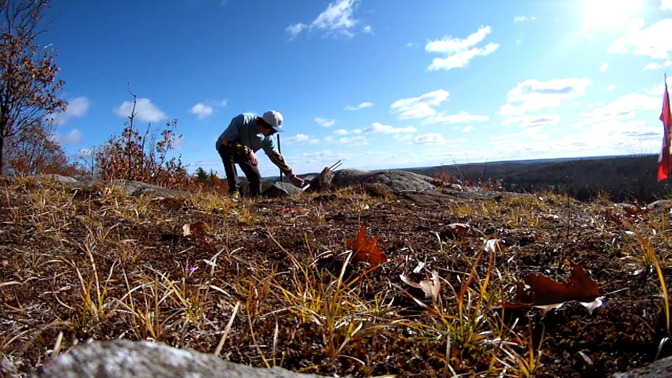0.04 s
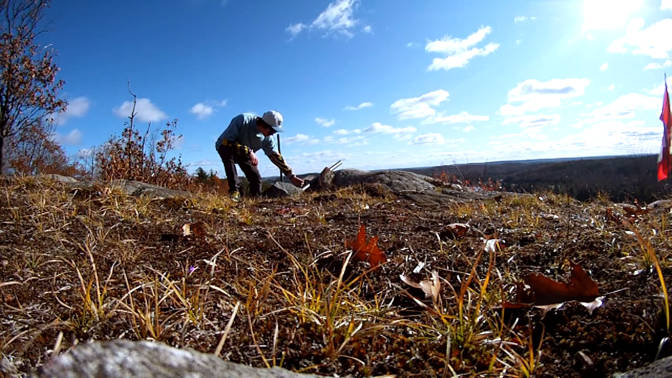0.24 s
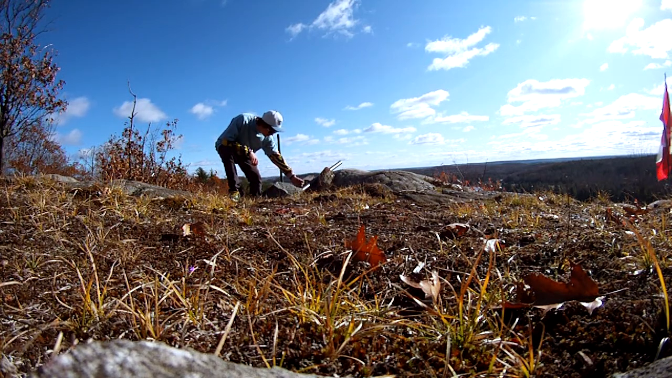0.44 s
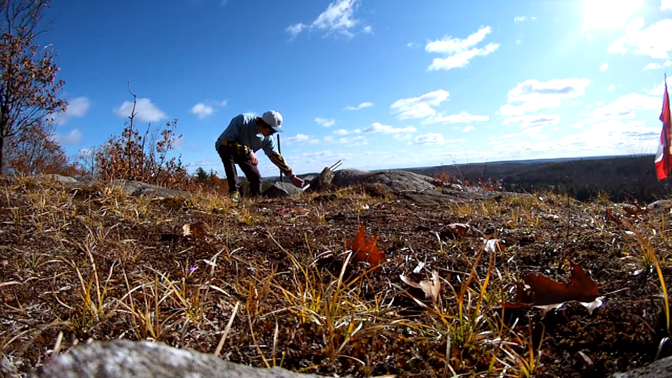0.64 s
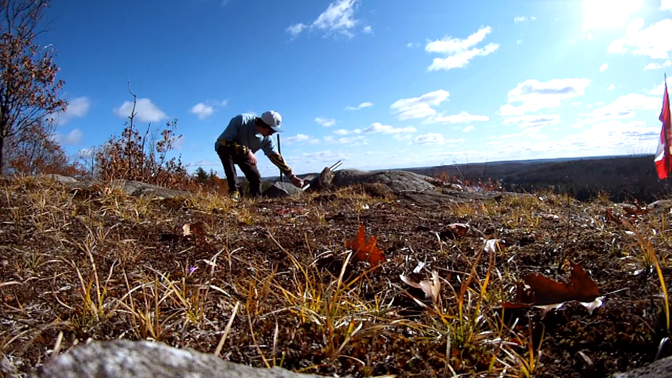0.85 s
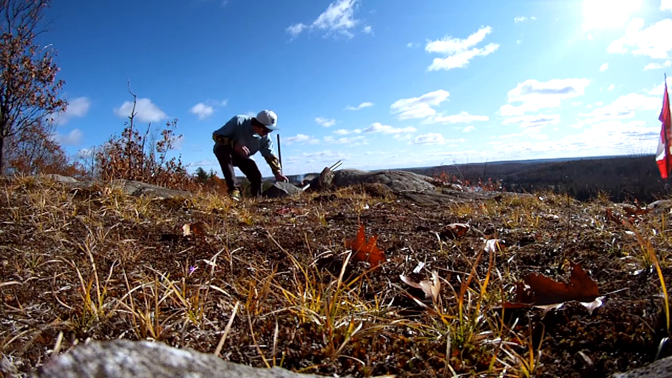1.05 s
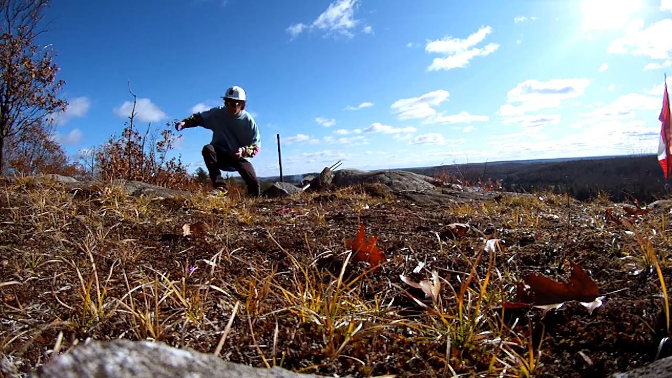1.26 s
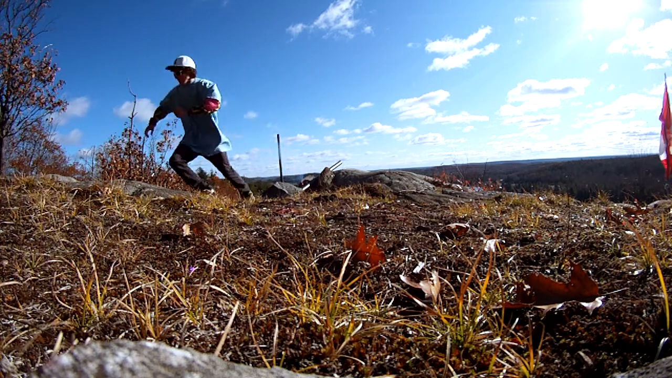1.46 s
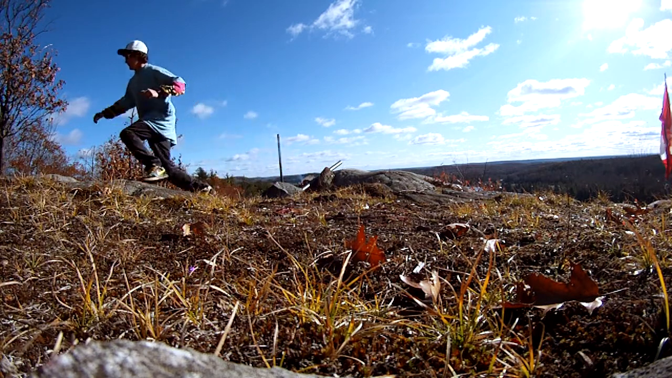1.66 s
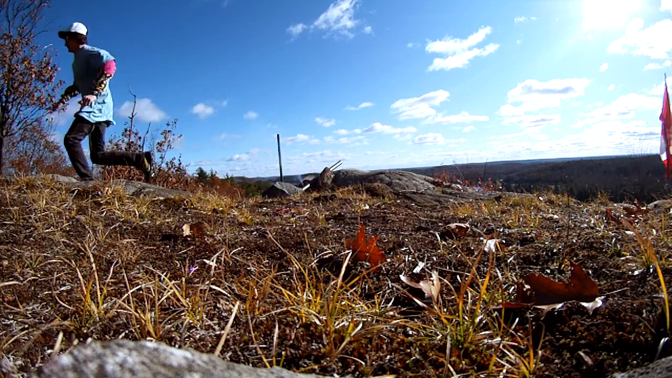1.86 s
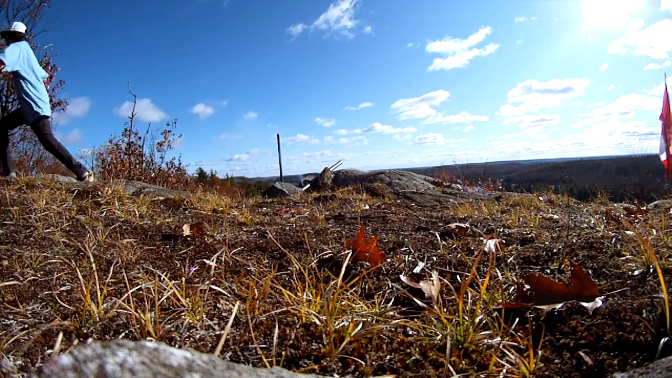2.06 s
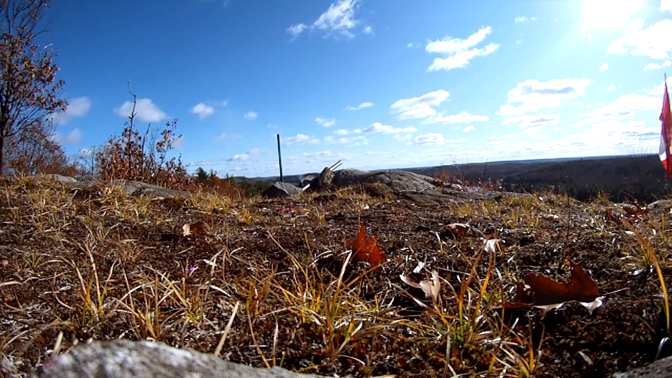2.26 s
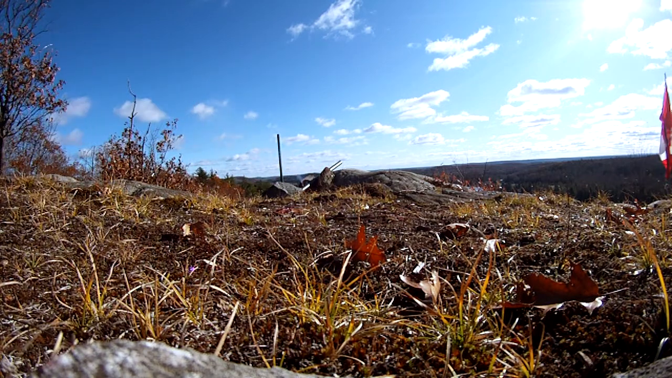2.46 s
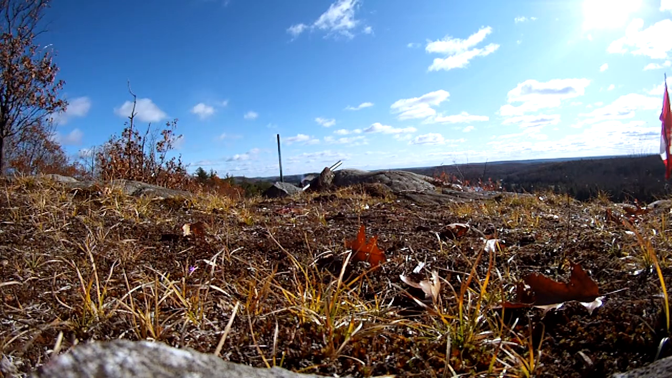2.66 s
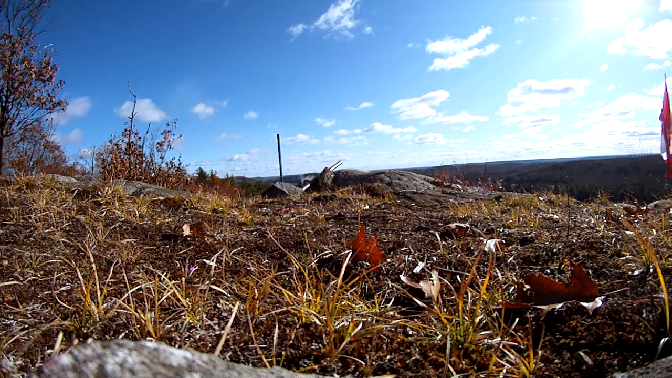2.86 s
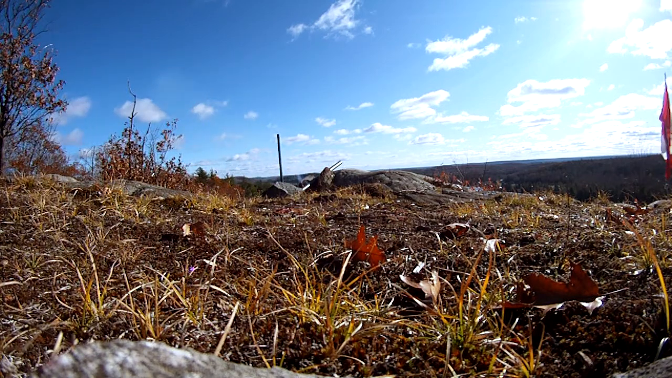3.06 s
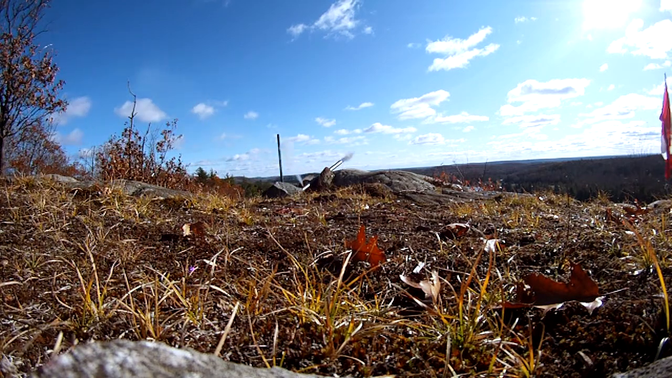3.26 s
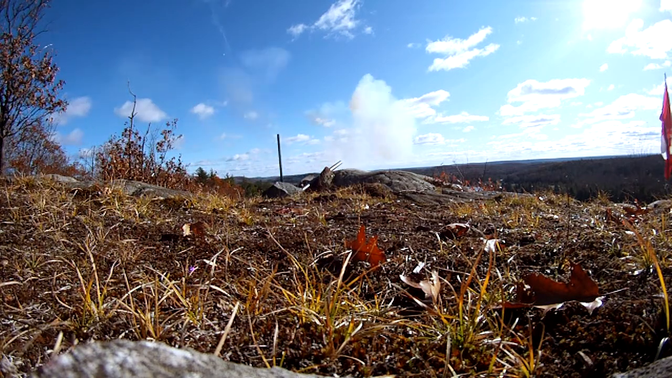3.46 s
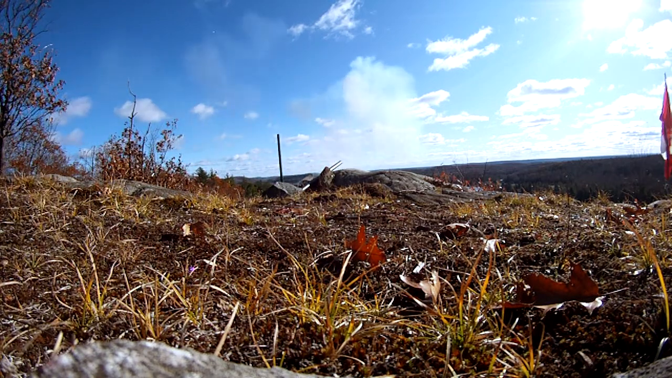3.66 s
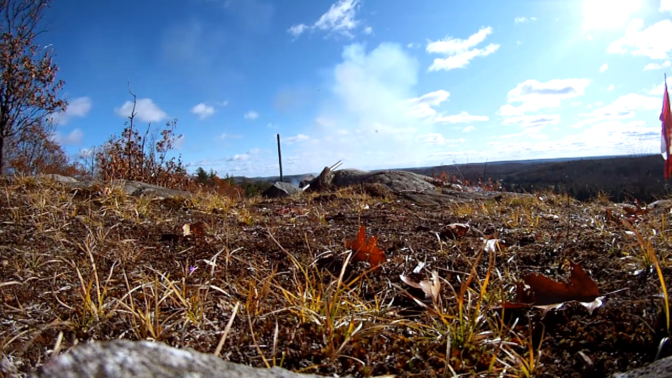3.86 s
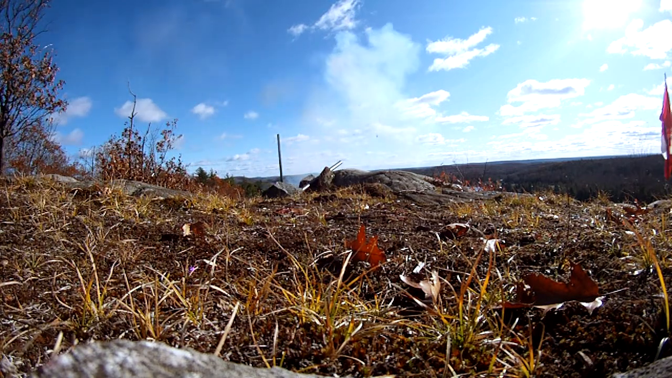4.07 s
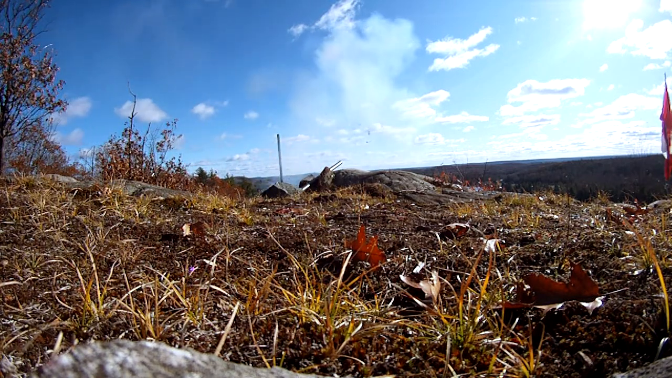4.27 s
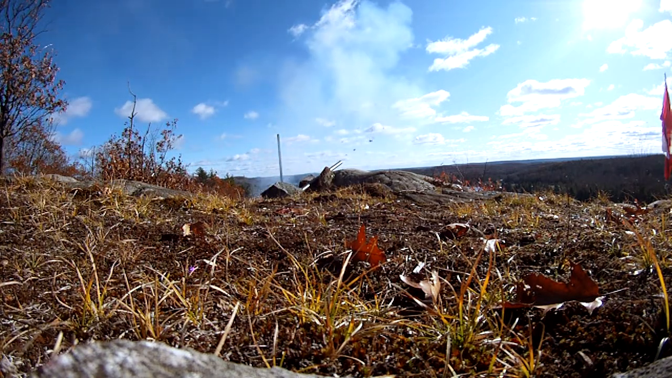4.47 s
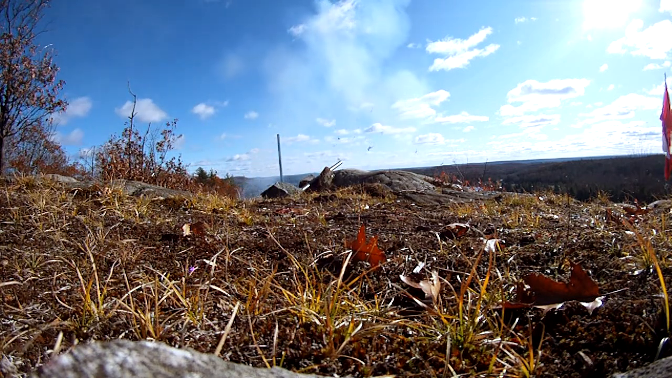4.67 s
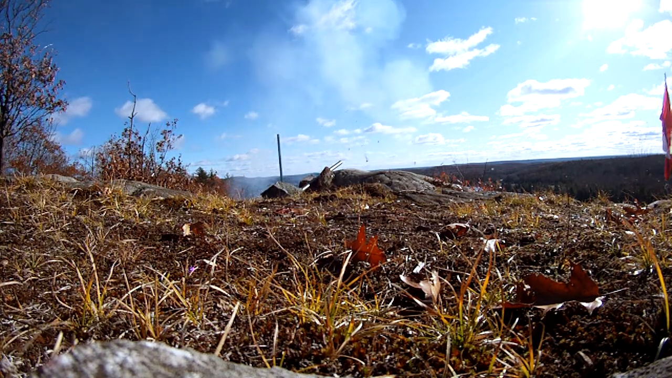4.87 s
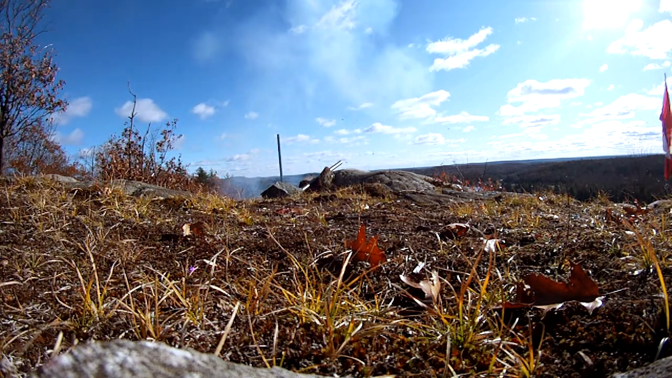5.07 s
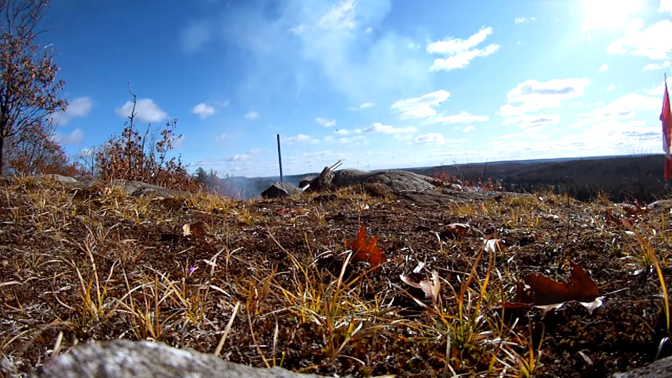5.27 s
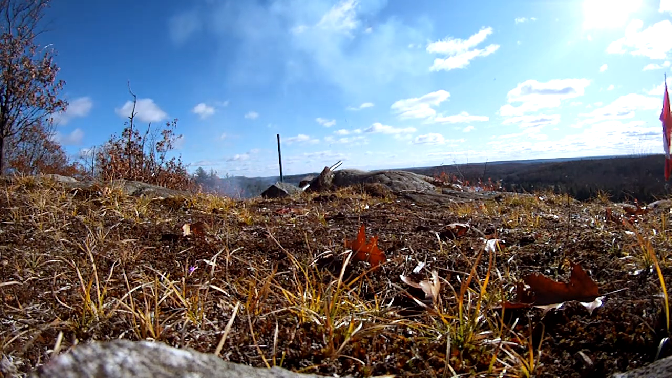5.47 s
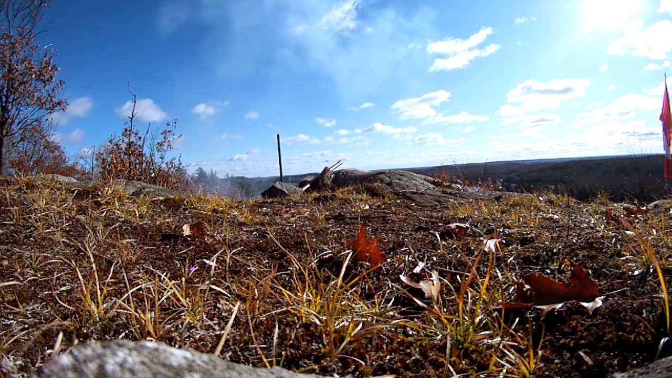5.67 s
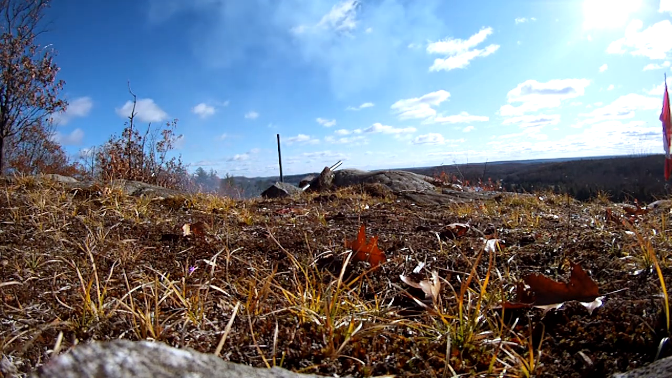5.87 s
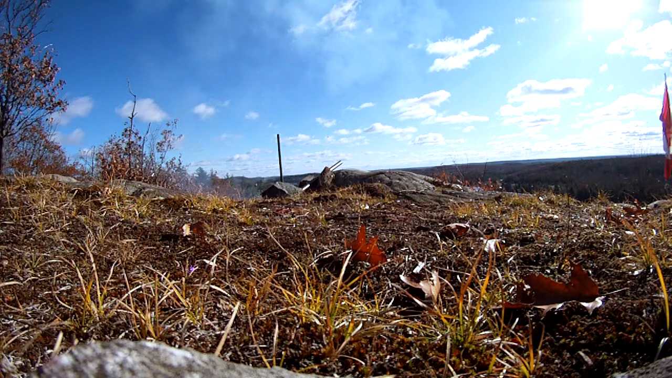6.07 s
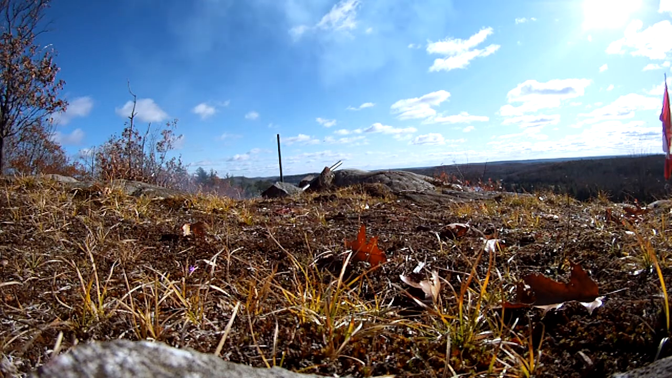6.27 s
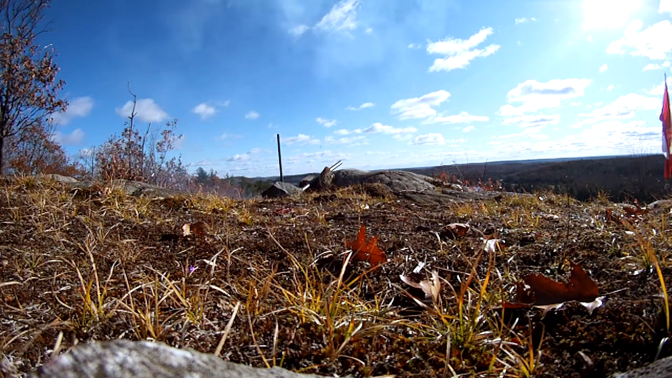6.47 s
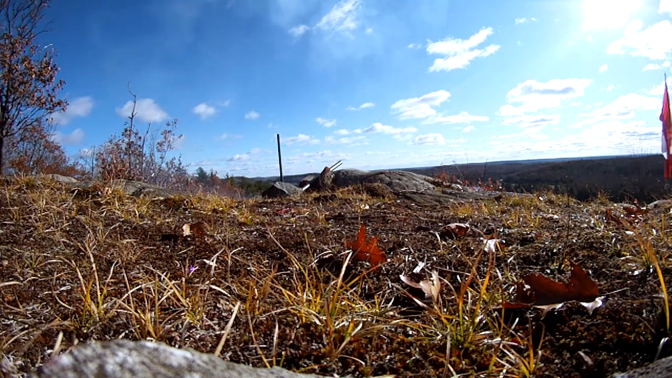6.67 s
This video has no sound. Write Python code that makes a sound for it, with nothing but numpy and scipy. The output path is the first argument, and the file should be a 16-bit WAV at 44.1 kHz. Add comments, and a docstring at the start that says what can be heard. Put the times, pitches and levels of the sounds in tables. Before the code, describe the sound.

A faint breeze on an open hilltop, heard close to the ground in dry grass. Around 0.6 s a fuse catches with soft, short flares, and from 0.85 s it hisses steadily, a grainy, sputtering gas jet. From 1.6 to 3.1 s someone runs clear: irregular dull thuds with scuffs on thin soil, the strongest at about 2.7 s. The hiss dips slightly, then at 3.27 s a small cannon fires once: sharp crack, tearing gas and a heavy low boom, flattened by overload and choked for an instant near 3.32 s. The blast decays within about half a second. Rumble rolls back from wooded ridges, swelling near 3.6, 3.9 and 4.5 s with knocking echoes, increasingly dull. A brighter residual hiss weakens and stops at 4.7 s. Fainter echoes return around 5.3 to 6.4 s, with tiny dry-leaf crunches and one soft step near 6.2 s.

```python
"""A fuse catches and hisses in a faint hilltop breeze, a few metres from a microphone in dry grass.
Someone runs clear on thin soil; then a small pipe cannon fires once and overloads the microphone.
The boom rolls back from wooded hills while the hiss burns on briefly; late on, dry leaves crunch.
Jet, blast, echoes and breeze are coloured noise; boom, steps and clear echoes are decaying sines."""
import sys
import numpy as np
from scipy import signal
from scipy.fft import rfft, irfft, next_fast_len
from scipy.io import wavfile
from scipy.ndimage import uniform_filter1d, map_coordinates

SR = 44100
rng = np.random.default_rng(int(sys.argv[2]) if len(sys.argv) > 2 else 0)


def log_audio(samples):
    """Write samples as a 16-bit WAV file to the path given in sys.argv[1]."""
    # one column per channel
    frames = np.atleast_2d(samples).T
    # limit to full scale, then quantise
    limited = np.clip(frames, -1, 1)
    pcm = np.round(limited * 32767).astype(np.int16)
    wavfile.write(sys.argv[1], SR, pcm)


N = 296433  # length in samples

# All source levels are in dB re full scale, ahead of the microphone, unless called relative.
SHOT_S = 3.272

# Powder blast close by. Each row: frequency in Hz, relative level in dB per Hz.
BLAST_SPECTRUM = [(29, -55.5), (50, -18), (165, -5.5), (195, -5), (259, -4.5), (362, -10.5), (494, -9.5),
                  (797, -16.5), (1010, -20), (1970, -24.5), (4890, -26.5), (9310, -33.5), (15000, -43)]
# Die-away of the blast among near rock and trees. Each row: frequency in Hz, time to fall 60 dB in s.
BLAST_DECAY = [(80, 0.76), (200, .62), (600, 0.81), (2000, 0.73), (5000, 0.49), (12000, 0.35)]
# Low resonances of the boom. Each row: frequency in Hz, level in dB before build-up and decay,
# time to fall 60 dB in s.
BOOM_RESONANCES = [(147, 9.5, 0.32), (178.2, 7, 0.38), (286, 4.5, 0.35), (431, 0.5, 0.45)]
# Slow suction behind the shock front: deepest moment and release, build-up and relaxation times.
SUCTION_S, SUCTION_END_S = 3.3165, 3.3294
SUCTION_BUILD_S, SUCTION_RELAX_S = .0018, .0065
SUCTION_DEPTH = 55  # full scales, ahead of the microphone

# Rumble from the hills. Each row: frequency in Hz, relative level in dB per Hz.
RUMBLE_SPECTRUM = [(26, -70), (45, -28), (108, -8.5), (165, 2.5), (293, -3), (511, -14.5), (562, -12.5),
                   (713, -23.5), (995, -23), (1580, -42), (2000, -39), (2600, -60), (4400, -120)]
# Wooded ridges, near to far. Each row: arrival in s, length in s, level in dB at arrival.
RIDGES = [(3.615, 0.2, -41), (3.861, 0.57, -35), (4.467, 0.63, -39.5), (5.29, 0.15, -47.5),
          (5.583, 0.17, -50.5), (6.119, 0.17, -47), (6.41, .33, -46.5)]
RIDGE_RISE_S, RIDGE_T60_S, RIDGE_SAG_DB_PER_S = 0.041, 0.79, 3.5
# Even scatter from the trees between the ridges; its level is reckoned at the moment of the shot.
FOREST_DB, FOREST_FADE_DB_PER_S = -40.5, 5.5
# Middle of the rumble relative to its bass: bright from near slopes, dull from far ones.
MIDDLE_NEAR_DB, MIDDLE_FAR_DB = 3, -8
DULL_HALFWAY_S, DULLING_S = 4.05, 0.22
# Single slopes that answer clearly. Each row: arrival in s, envelope peak in dB before muffling,
# pitch in Hz.
CLEAR_SLOPES = [(3.59, -15, 286), (3.791, -23.5, 394), (3.998, -18, 280), (4.152, -25, 258),
                (4.224, -24, 195), (4.394, -24, 230), (4.786, -29.5, 260), (4.924, -28.5, 220),
                (5.65, -33, 240.3), (6.246, -30.5, 230)]

# Gas jet of the fuse before the shot. Each row: frequency in Hz, relative level in dB per Hz.
JET_BEFORE = [(65, -25.5), (110, -6.5), (212, 0.5), (386, -6.5), (455, -4.5), (514, -4.5), (792, -10.5),
              (878, -10.5), (1270, -10.5), (1500, -8), (1770, -8), (3020, -16), (7150, -12.5), (13800, -21),
              (15000, -37.5)]
# Gas jet left after the shot. Each row: frequency in Hz, relative level in dB per Hz.
JET_AFTER = [(300, -5.5), (1000, -4), (1700, 2.5), (2300, -1), (3100, -8.5), (3800, -5.5), (4600, -3.5),
             (5900, -4.5), (7500, -0.5), (10200, -5.5), (13900, -13.5), (15000, -23.5)]
# Spells of burning, before and after the shot. Each row: start in s, end in s, rise in s,
# level in dB at the start, growth in dB per s.
BURNS = [(.84, 3.27, .14, -48.5, 0.64), (3.4, 3.895, .1, -40.5, -8.5), (3.895, 4.712, .05, -45, -0.4)]
BURN_OUT_S = .016  # time constant of the dying jet
TOUCH_HOLE_S, TOUCH_HOLE_DB = .3, -4  # the flame sinks into the barrel just before the shot
# Flares as the fuse catches and as the flame reaches the charge. Each row: centre time in s,
# Gaussian length in s, centre frequency in Hz, width in Hz, level in dB at the peak.
FLARES = [(.63, 0.08, 6500, 2000, -65), (.695, .035, 5230, 1200, -61), (.94, 0.055, 1280, 1670, -49.5),
          (.91, 0.042, 258, 420, -53.5), (3.26, 0.024, 900, 1600, -46), (3.268, 0.01, 220, 220, -27.5),
          (3.273, 0.00098, 998, 900, -15)]

# Footfalls on thin soil over rock, heel and sole apart where both land. Each row: start in s,
# envelope peak in dB before muffling, pitch in Hz, swell time in s.
STEPS = [(1.57, -43.5, 300, .002), (1.8521, -22.5, 245, 0.002), (2.055, -36, 866, 0.00096),
         (2.061, -32.5, 332, 0.0028), (2.095, -31, 227, 0.00078), (2.413, -35, 173, 0.0012),
         (2.6858, -23, 746, 0.00066), (2.6862, -14.5, 316, 0.0014), (2.993, -27, 560, 0.001),
         (2.997, -28, 193, 0.0032), (3.081, -38.5, 214, 0.0031), (6.198, -30, 640, .001)]
# Dry leaves crunching. Each row: centre time in s, Gaussian length in s, centre frequency in Hz,
# width in Hz, level in dB at the peak.
LEAVES = [(5.38, 0.011, 6000, 6060, -63), (5.73, 0.0074, 2250, 1800, -56), (5.775, .007, 2500, 2400, -60),
          (6.2, 0.00093, 8460, 4000, -56), (6.211, 0.0091, 2190, 2100, -59), (6.34, 0.008, 3100, 3400, -57)]

# Open air over the hilltop. Each row: frequency in Hz, relative level in dB per Hz.
AIR_SPECTRUM = [(24, -61), (40, -32.5), (169, 5), (910, -4), (1000, -2.5), (1080, -7.5), (1170, -3.5),
                (1460, -8), (2990, -8.5), (13600, -14), (15000, -31.5)]
AIR_DB = -58.5


def blast():
    """The shot: a bark of gas and a low ring, then scatter from rock and trees that loses its treble first."""
    age = np.maximum(clock() - SHOT_S, 0)
    # the bass needs a few cycles to build up
    build_up = np.minimum(age / 0.028, 1) ** 2
    ring = sum(undb(db - 60 * age / t60) * np.sin(2 * np.pi * hz * age)
               for hz, db, t60 in BOOM_RESONANCES)
    bass_noise = resonate(noise(), 190, 170) * undb(7.5 - 60 * age / 0.33)
    punch = (ring + bass_noise) * build_up
    bark = resonate(noise(), 600, 1100) * undb(10.5 - 60 * age / 0.24)
    # the gas tears out of the muzzle for a tenth of a second, then stops
    tearing = resonate(noise(), 3000, 7500) * undb(-6.5) / (1 + (age / 0.1) ** 8)
    # the shock front itself is a bright crack
    crack = noise() * undb(-4.0) * np.exp(-.5 * ((age - .007) / .0022) ** 2)
    scatter = undb(-11.5) * near_scatter(age)
    onset = np.minimum(age / .012, 1) ** 2
    return onset * (scatter + punch + bark + tearing + crack) + suction()


def near_scatter(age):
    """Rock and trees close by return grainy noise, with its own die-away in each octave band."""
    roar = colour(noise() * undb(1.6 * walk(260)), BLAST_SPECTRUM)
    scatter = np.zeros(N)
    for hz in 1000 * 2. ** np.arange(-5, 5):
        band = shape(roar, lambda f: np.maximum(1 - np.abs(np.log2(f / hz)), 0))
        # the spectrum is that of the sound 0.15 s after the shot
        scatter += band * undb(-60 * (age - .15) / at_pitch(BLAST_DECAY, hz))
    return scatter


def suction():
    """Low pressure behind the shock front: it builds fast, relaxes and lets go within a millisecond."""
    since = clock() - SUCTION_S
    pull = np.exp(np.minimum(since / SUCTION_BUILD_S, -since / SUCTION_RELAX_S))
    release = np.clip((SUCTION_END_S - clock()) / .001, 0, 1)
    return -SUCTION_DEPTH * pull * release


def hills():
    """Countless small echoes merge into a rumble that swells with each ridge and dulls with distance."""
    t = clock()
    echoes = noise() * undb(1.57 * walk(70))
    rumble = colour(echoes, RUMBLE_SPECTRUM)
    bass = shape(rumble, lambda f: 1 / (1 + (f / 380) ** 8))
    middle = rumble - bass
    nearness = 1 / (1 + np.exp((t - DULL_HALFWAY_S) / DULLING_S))
    middle_db = MIDDLE_FAR_DB + (MIDDLE_NEAR_DB - MIDDLE_FAR_DB) * nearness
    roll = np.sqrt(hill_power()) * (unit(bass) + unit(middle) * undb(middle_db))
    arrival = np.clip((t - 3.45) / 0.22, 0, 1)
    answers = sum(thud(s, db, hz, 0.0016) for s, db, hz in CLEAR_SLOPES)
    return arrival * roll + muffle(answers, 120, 1060)


def hill_power():
    """Powers of the forest scatter and of every ridge add, since their echoes are unrelated."""
    t = clock()
    power = undb(FOREST_DB - FOREST_FADE_DB_PER_S * (t - SHOT_S)) ** 2
    for s, length, db in RIDGES:
        # ln 1000 turns a 60 dB fall into a time constant
        ridge = swell(s, s + length, RIDGE_RISE_S, RIDGE_T60_S / np.log(1000))
        power = power + (ridge * undb(db - RIDGE_SAG_DB_PER_S * (t - s))) ** 2
    return power


def fuse():
    """A sputtering jet of powder gas, which blows harder and brighter after the shot."""
    jet = noise() * undb(.55 * walk(13) + 1.0 * walk(170))
    jet = bounce(jet, .0007, db=-17)
    jet = bounce(jet, .0029, db=-15)
    hiss = np.where(clock() < SHOT_S, colour(jet, JET_BEFORE), colour(jet, JET_AFTER))
    return hiss * burning() + puffs(FLARES, grain_db=0.0)


def burning():
    """Strength of the gas jet: each spell catches, burns and dies; the touch hole dims it before the shot."""
    t = clock()
    spells = sum(swell(start, end, rise, BURN_OUT_S) * undb(db + growth * (t - start))
                 for start, end, rise, db, growth in BURNS)
    sunk = np.clip(1 - (SHOT_S - t) / TOUCH_HOLE_S, 0, 1) * (t < SHOT_S)
    return spells * undb(TOUCH_HOLE_DB * sunk)


def bounce(x, lag_s, db):
    """Add a copy off nearby ground; the lag sways with the breeze and combs the treble."""
    lag = lag_s * SR * (1 + 0.056 * walk(3))
    return x + undb(db) * map_coordinates(x, [np.arange(N) - lag], order=3)


def footsteps():
    """Dull thuds, each with a scuff of the sole and a shudder of the turf; later, dry leaves crunch."""
    thuds = sum(thud(s, db, hz, build_s) for s, db, hz, build_s in STEPS)
    load = np.sqrt(np.abs(uniform_filter1d(thuds ** 2, size=200)))
    scuff = load * resonate(noise(), 480, 410) * undb(-12.0)
    age = clock()[:SR // 4]
    turf = noise()[:len(age)] * undb(-60 * age / 0.107)
    turf = turf / np.linalg.norm(turf)
    shudder = undb(-10) * signal.fftconvolve(thuds, turf)[:N]
    crunch = puffs(LEAVES, grain_db=2.5)
    return muffle(thuds + scuff + shudder, 100, 1170) + crunch


def air():
    """Faint breeze over the hilltop: coloured noise whose level wanders slowly."""
    return colour(noise(), AIR_SPECTRUM) * undb(AIR_DB + 0.26 * walk(2.7))


def thud(s, db, hz, build_s):
    """A short pressure pulse: a sine that swells fast and dies."""
    age = np.clip(clock() - s, 0, 1)
    rise = age / build_s
    return undb(db) * rise * np.exp(1 - rise) * np.sin(2 * np.pi * hz * age)


def puffs(rows, grain_db):
    """Short swells of grainy noise, each in its own band."""
    out = np.zeros(N)
    for s, length, hz, width, db in rows:
        grains = noise() * undb(grain_db * walk(300))
        envelope = np.exp(-.5 * ((clock() - s) / length) ** 2)
        out += undb(db) * envelope * resonate(grains, hz, width)
    return out


def swell(start, end, rise_s, fall_s):
    """Envelope that rises, holds until its end, then dies away exponentially."""
    t = clock()
    return np.clip((t - start) / rise_s, 0, 1) * np.exp(-np.maximum(t - end, 0) / fall_s)


def muffle(x, low_hz, high_hz):
    """Keep only the dull middle of a knock."""
    return shape(x, lambda f: 1 / (1 + (f / high_hz) ** 4) / np.sqrt(1 + (low_hz / f) ** 2))


def resonate(x, hz, width_hz):
    """Steep-sided resonance, at rms 1."""
    return unit(shape(x, lambda f: 1 / (1 + ((f * f - hz * hz) / (f * width_hz)) ** 2)))


def colour(x, points):
    """Give a sound a spectrum, at rms 1."""
    return unit(shape(x, lambda f: undb(at_pitch(points, f))))


def shape(x, gain):
    """Filter by a gain given as a function of Hz."""
    size = next_fast_len(N + SR // 4)
    hz = np.fft.rfftfreq(size, 1 / SR) + 1e-3
    return irfft(rfft(x, size) * gain(hz), size)[:N]


def at_pitch(points, hz):
    """Read (Hz, value) points on a log-frequency axis."""
    f, value = np.transpose(points)
    return np.interp(np.log(hz + 1e-3), np.log(f), value)


def unit(x):
    """Scale to rms 1."""
    return x / np.sqrt(np.mean(x ** 2) + 1e-20)


def noise():
    """White noise."""
    return rng.standard_normal(N)


def walk(rate):
    """Random levels held 1 / rate s and slewed twice; spread near 1."""
    k = int(SR / rate)
    held = rng.standard_normal(N)[np.arange(N) // k]
    slewed = uniform_filter1d(held, k)
    return 1.3 * uniform_filter1d(slewed, k)


def undb(db):
    """Decibels to gain."""
    return 10 ** (np.asarray(db) / 20)


def clock():
    """Time of every sample in seconds."""
    return np.arange(N) / SR


def scene():
    """Everything that reaches the microphone in the grass."""
    return (blast() + hills() + fuse() + footsteps() + air())[None]


def record(dry):
    """The suction pins the diaphragm and chokes the sound for an instant; the amplifier clips flat."""
    travel = 4.0  # limit of the diaphragm, in full scales
    diaphragm = dry / np.sqrt(1 + (dry / travel) ** 2)
    low_cut = signal.butter(3, 100, "high", fs=SR, output="sos")
    coupled = signal.sosfilt(low_cut, diaphragm)
    clipped = np.clip(coupled, -1, 1)
    # steep treble limit at 16 kHz: 0.1 dB ripple, 70 dB rejection
    high_cut = signal.ellip(8, .1, 70, 16000, fs=SR, output="sos")
    return signal.sosfilt(high_cut, clipped)


dry = scene()
out = record(dry)
log_audio(out)
```